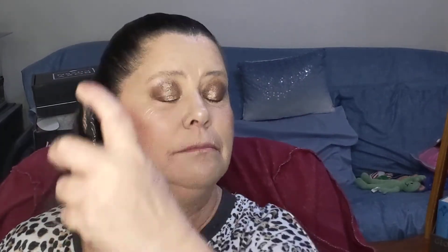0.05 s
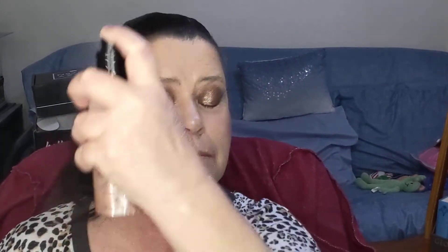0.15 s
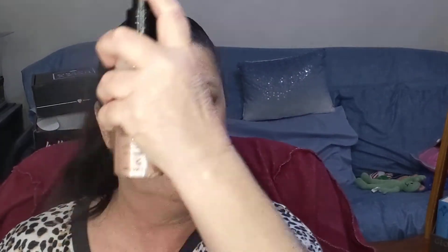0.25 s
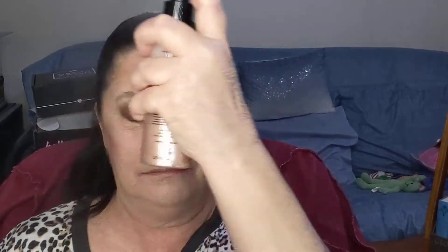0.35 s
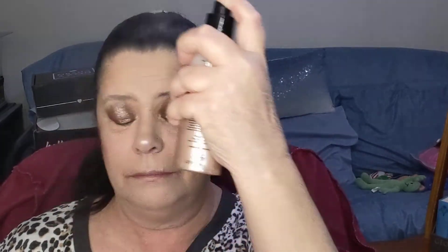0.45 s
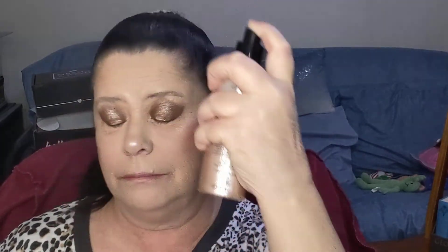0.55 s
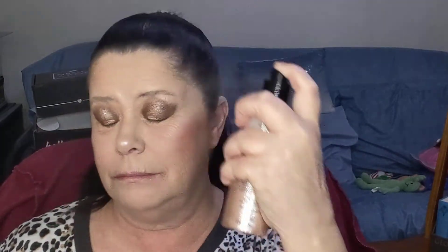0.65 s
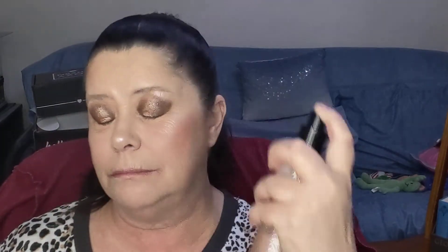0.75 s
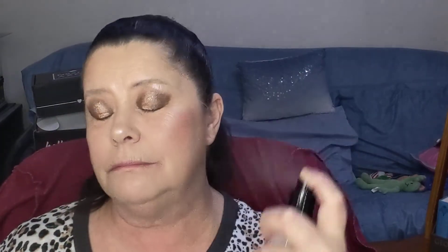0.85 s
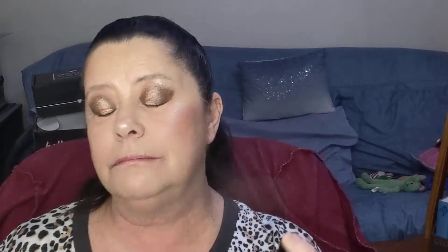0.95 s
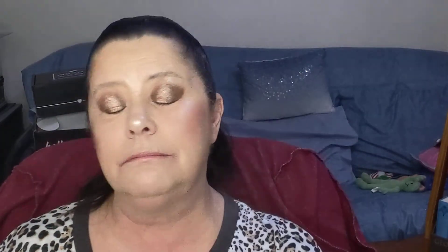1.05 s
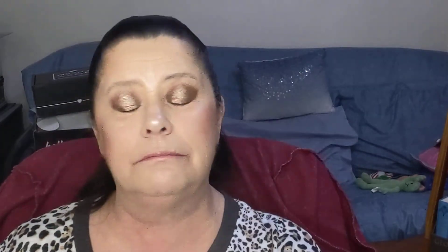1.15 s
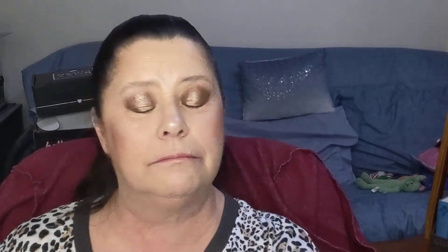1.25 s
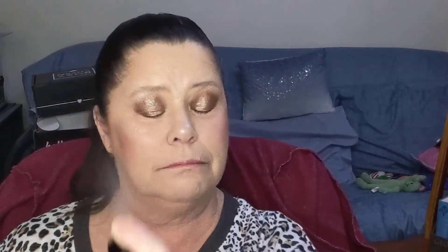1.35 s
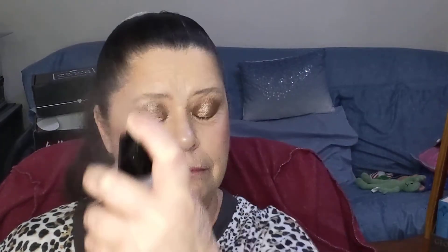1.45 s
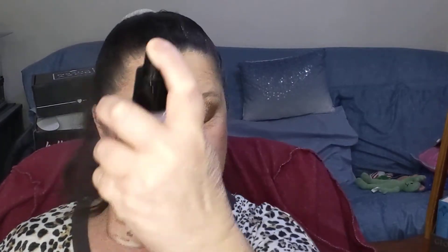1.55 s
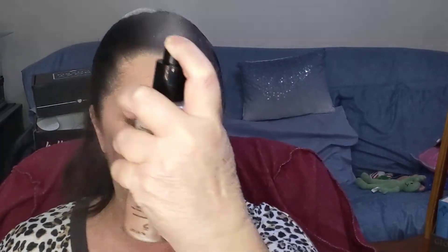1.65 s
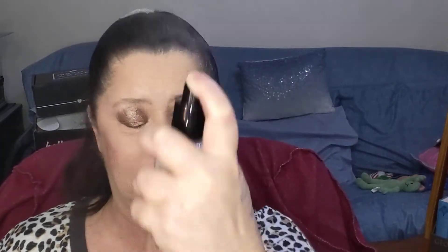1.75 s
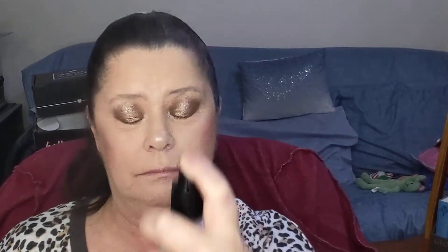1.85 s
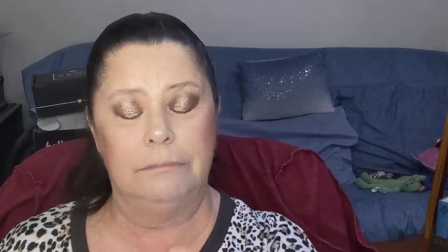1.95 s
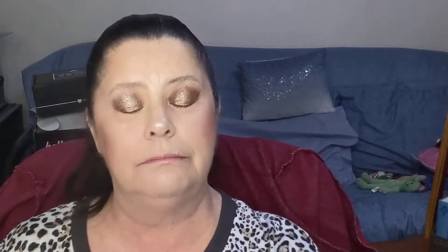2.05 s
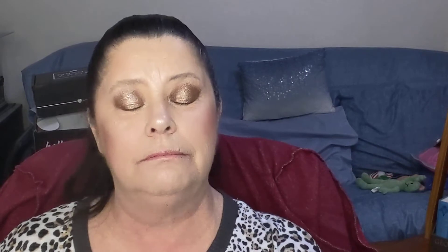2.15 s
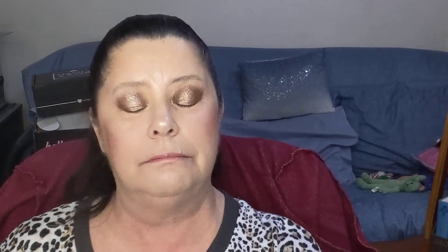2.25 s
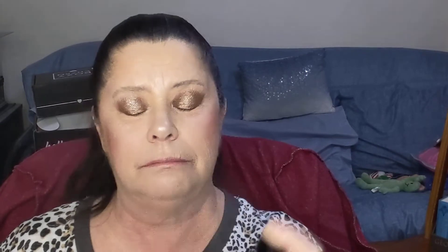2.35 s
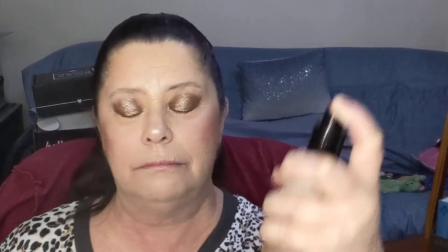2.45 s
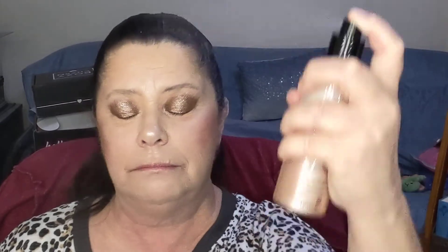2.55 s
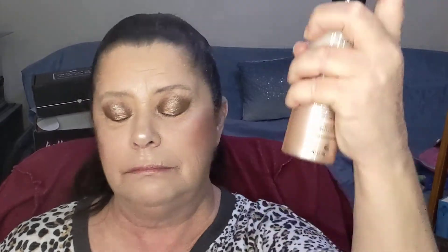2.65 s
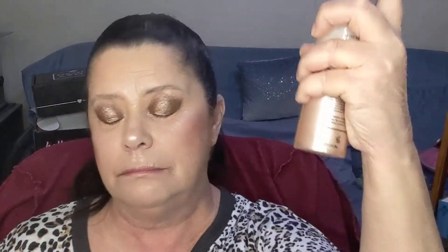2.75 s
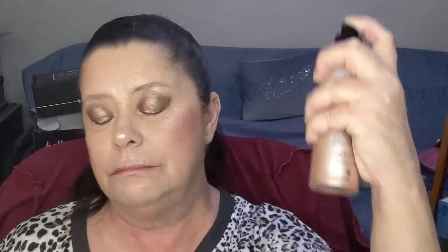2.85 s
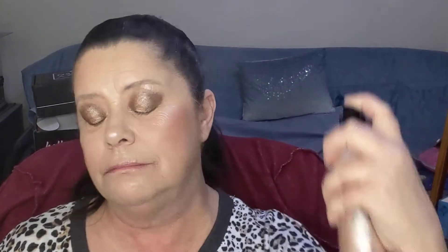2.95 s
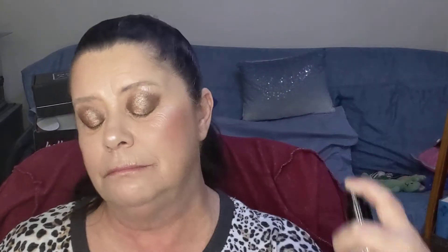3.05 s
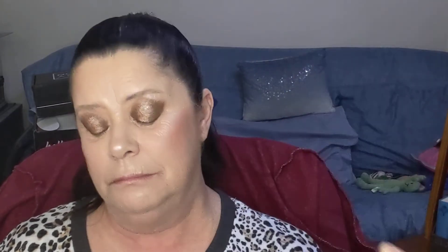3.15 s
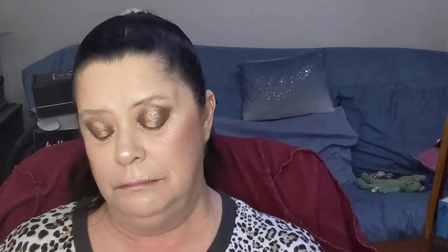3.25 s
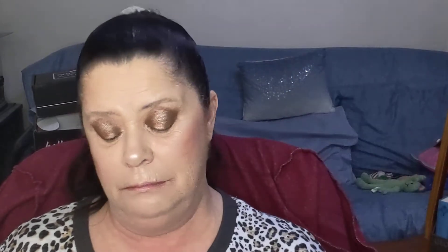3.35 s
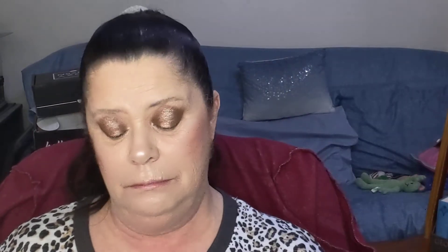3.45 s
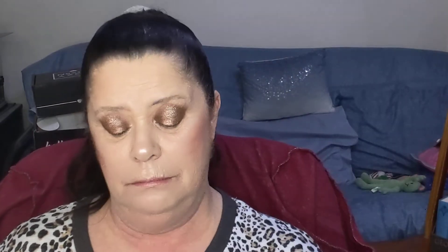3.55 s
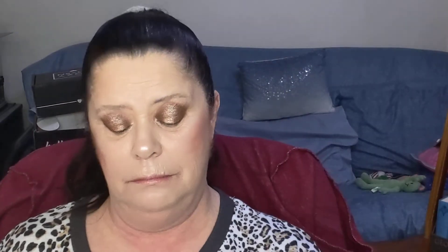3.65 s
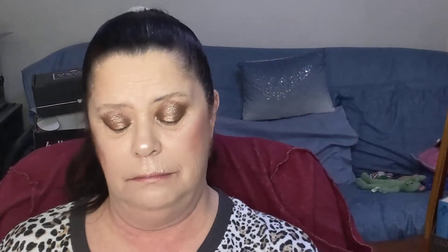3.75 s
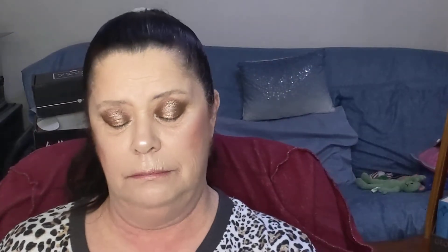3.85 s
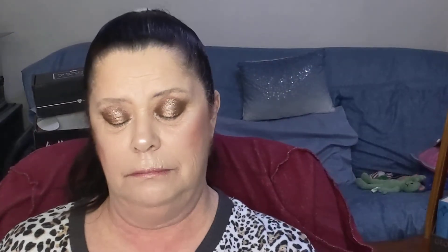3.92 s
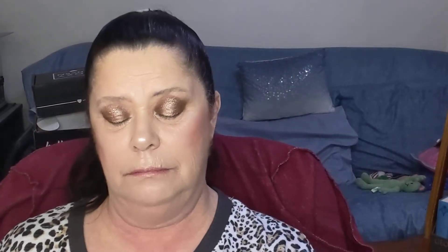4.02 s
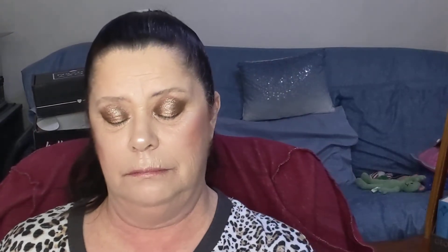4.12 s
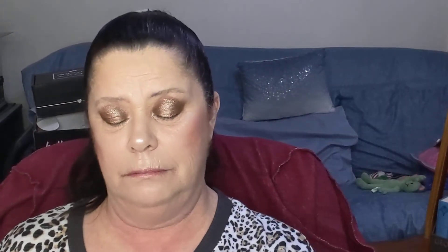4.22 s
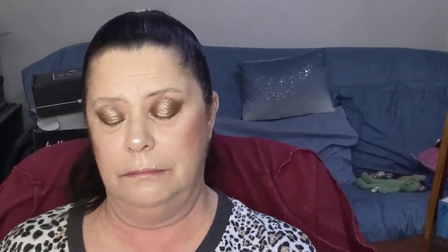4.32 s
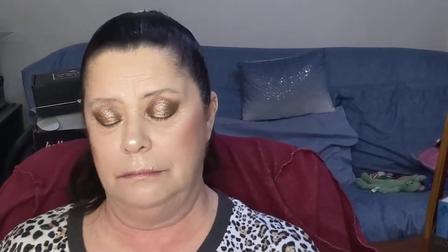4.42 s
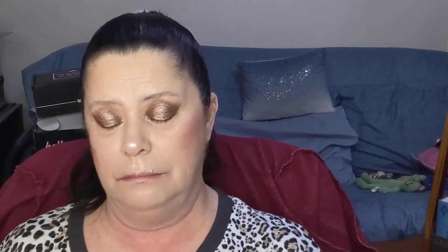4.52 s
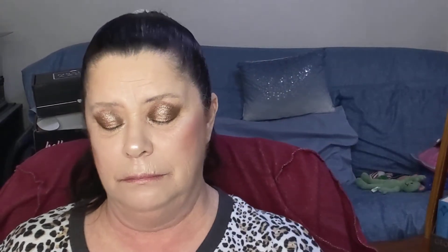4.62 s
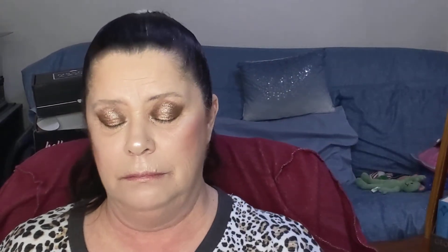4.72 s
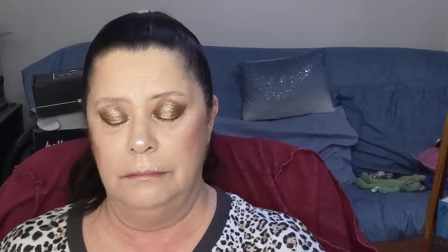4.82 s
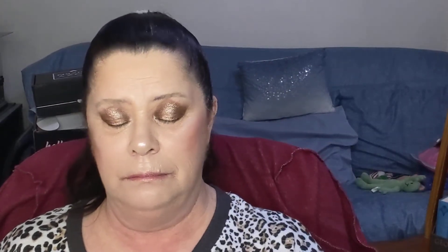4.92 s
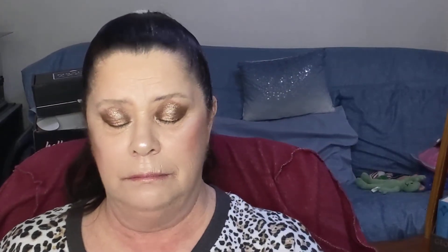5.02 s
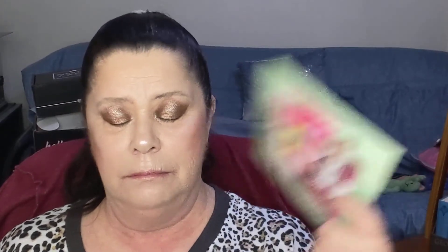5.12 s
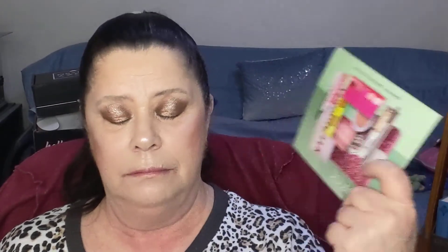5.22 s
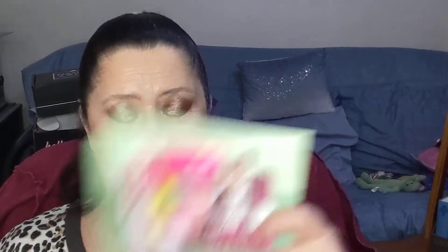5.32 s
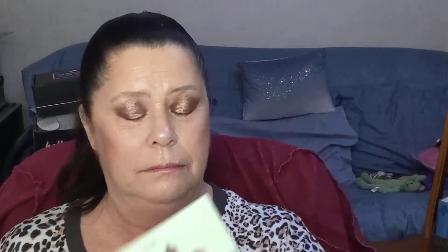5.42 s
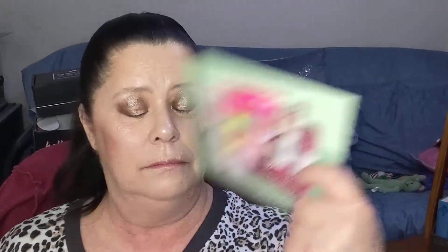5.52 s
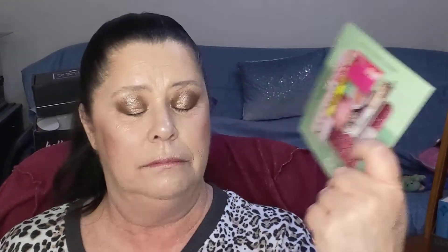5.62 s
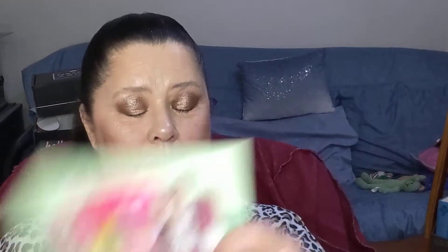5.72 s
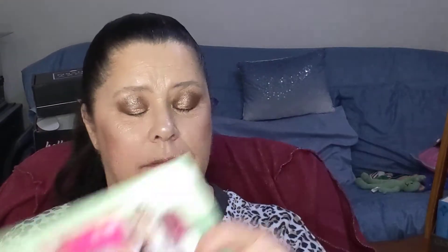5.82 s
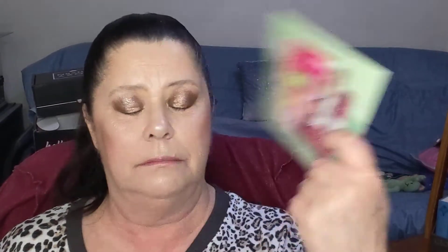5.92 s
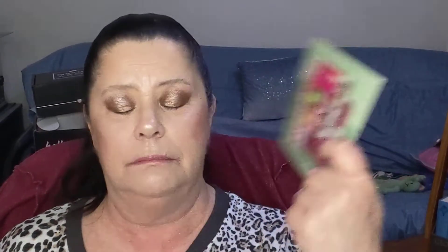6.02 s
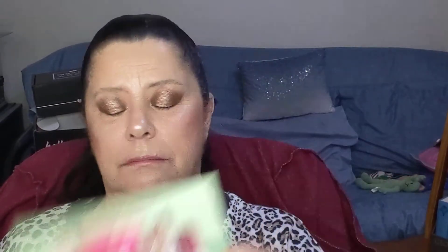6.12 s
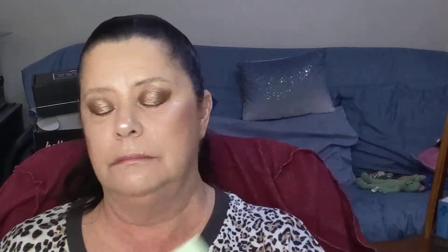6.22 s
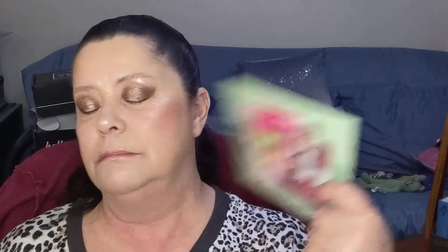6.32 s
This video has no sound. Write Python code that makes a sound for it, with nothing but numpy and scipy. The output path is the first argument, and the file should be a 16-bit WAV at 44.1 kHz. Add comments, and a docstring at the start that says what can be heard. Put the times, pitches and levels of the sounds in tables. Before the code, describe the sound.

Close to the microphone in a small furnished room with a faint electrical hum, a mist bottle is pumped rapidly, about four times a second. Every puff hisses and ends with a clack of the plunger and a light tick. The spraying stops, and the bottle is put down on a table with a sharp knock, a low thump and a short wobble. A light click and the soft scrape of a card follow.

```python
"""A small furnished room, still air and mains hum, a camera's stereo microphone close to the hands.
A pump bottle of face mist is pressed twelve times. Each stroke hisses until the plunger clacks on its
stop; the spring pings as the finger lets go, and a quick next press catches the rising head with a tick.
The liquid slops briefly. The bottle is put down on a table with a knock and a thump and rocks;
then a card is picked up with a faint scrape."""
import sys
import numpy as np
from scipy import signal
from scipy.fft import rfft, irfft, next_fast_len
from scipy.io import wavfile
from scipy.ndimage import uniform_filter1d, map_coordinates

SR = 44100
rng = np.random.default_rng(int(sys.argv[2]) if len(sys.argv) > 2 else 0)


def waveform_to_disk(signal):
    """Save audio, clipped to [-1, 1], as 16-bit WAV at the path in sys.argv[1]."""
    frames = np.transpose(np.atleast_2d(signal))
    scaled = np.clip(frames, -1, 1) * 32767
    samples = np.round(scaled).astype(np.int16)
    wavfile.write(sys.argv[1], SR, samples)


N = 281358

# room tone: (frequency [Hz], level [dB])
AIR_SPECTRUM = [(25, -30), (55, -11.5), (90, -15), (110, -8.5), (165, -5.5), (230, -7.5), (285, -17.5),
                (365, -17.5), (560, -20.5), (1400, -23), (1800, -23.5), (4000, -29), (11000, -39.5),
                (15800, -47)]
# how alike the air is at the two microphone ports: (frequency [Hz], correlation [ratio])
AIR_LIKENESS = [(60, 0.46), (200, 0.18), (600, 0.6), (2000, 0.033), (8000, 0.057)]
# mains partials: (frequency [Hz], peak level [dB])
HUM_PARTIALS = [(59.2, -77.5), (118.4, -65.5), (177.6, -71), (355.3, -83)]
# the room's tail: (frequency [Hz], t60 [s])
ROOM_DECAY = [(100, 0.57), (500, 0.29), (2000, 0.33), (6000, 0.35), (15000, 0.2)]
# imbalance of the microphone ports: (frequency [Hz], left minus right [dB])
PORT_BALANCE = [(1500, -0.05), (8500, -0.5), (11500, 4), (13700, 11), (15800, -5)]

# pump strokes: (start [s], plunger stop [s], level [dB], extra mist body [dB], shell resonance [Hz])
STROKES = [(-.065, 0.0498, -50.5, 3, 1960), (0.17, .2855, -51, 3, 1790), (0.403, .519, -53.5, 5.5, 1820),
           (0.628, .743, -54.5, 3, 1920), (.859, .995, -53.5, 0, 1820), (1.145, 1.283, -49.5, 2, 1840),
           (1.4, 1.53, -50, 3.5, 1880), (1.659, 1.787, -52.2, 6, 1750), (1.921, 2.0454, -51.5, 2.5, 1860),
           (2.337, 2.455, -51.5, 3.5, 1800), (2.568, 2.695, -51, -4, 1780), (2.828, 2.946, -53, -1, 1870)]
# the jet at even steps of the plunger's travel: (relative level [dB])
JET_PRESSURE = [-7.5, -1.5, -0.5, -1.3, -11, -4.5]
# spectra of the pump, close up: (frequency [Hz], level [dB])
MIST_SPECTRUM = [(200, -55), (700, -12), (1300, -6.5), (1750, -3.5), (2800, -1.5), (5500, -1.5),
                 (8300, -3.5), (10000, -5.5), (10800, -0.5), (13500, -5), (15800, -9)]
CLACK_SPECTRUM = [(100, -52), (300, -9), (550, -4), (900, -2.5), (1350, -7.5), (1780, 2.5), (2100, -5.5),
                  (2500, -1.5), (3700, -22), (6000, -13.5), (8300, -22), (10000, -17.5), (10750, -13),
                  (15800, -38)]
SHELL_SPECTRUM = [(250, -32), (440, 1.5), (600, -25.5), (1000, -8.5), (1500, -9.5), (1820, 5.5), (2150, -5),
                  (2800, -11), (3300, -21), (6000, -18.5), (15800, -47)]
TICK_SPECTRUM = [(300, -14), (1200, -31), (1800, -22), (3500, 2.5), (6000, 7.5), (8000, 0.5), (9200, 8),
                 (10800, 4), (15800, -3)]
HOLLOW_SPECTRUM = [(120, -18.5), (400, 12.5), (800, 4), (1200, -0.5), (1800, 6), (3500, -7), (15000, -81)]
# return spring modes: (frequency [Hz], level [dB], t60 [s])
SPRING_MODES = [(9050, -39, .06), (9230, -43, .05), (10750, -42, .025)]
# air pockets in the slopping liquid: (time [s], level [dB], starting pitch [Hz])
SLOPS = [(1.845, -58, 387), (1.907, -47, 500), (1.944, -47.5, 373), (1.947, -44.5, 534),
         (1.949, -50.5, 175)]
# the head coming home and things clicking in the hand: (time [s], level [dB], relative ring [dB])
CLICKS = [(2.234, -37, 13), (3.051, -43.5, 6), (3.335, -43, -8), (3.612, -41, -10), (4.7193, -32, -23)]

# things sliding over the table: (peak time [s], width [s], level [dB], scrape resonance [Hz])
SLIDES = [(3.7, 0.025, -74, 4950), (4.01, .018, -62.5, 3040), (4.114, 0.0194, -62, 4700),
          (4.655, 0.013, -68.5, 1000), (4.885, 0.014, -67.5, 3500), (5.04, 0.046, -68.5, 3500),
          (5.105, 0.013, -61, 1760), (5.23, 0.024, -75, 2200)]
# hard contacts on the table top: (time [s], level [dB], extra treble [dB])
KNOCKS = [(3.9435, -12.5, 0), (3.951, -22, 3.5), (4.016, -37.5, -12), (4.0365, -32.5, -12),
          (4.122, -32.5, -16), (4.7186, -48, 15.5)]
# spectra of rubbing and striking the table top: (frequency [Hz], level [dB])
RUB_SPECTRUM = [(200, -4), (1000, -1.5), (3500, -7), (4900, -8.5), (6300, -10.5), (11000, -13),
                (15800, -22)]
CRACK_SPECTRUM = [(80, -24.5), (400, 2.5), (750, 5.5), (1100, 7), (1550, 4), (2200, -13), (3800, -9.5),
                  (5200, -13.5), (6500, -22.5), (11000, -22), (15800, -35)]
RATTLE_SPECTRUM = [(200, -10.5), (500, -1.5), (720, 2), (1000, -4), (1330, -2), (1750, -4), (2200, -14),
                   (3700, -14.5), (6000, -23.5), (11000, -30), (15800, -36)]
# weight landing and rocking: (time [s], level [dB], frequency driven most [Hz])
THUMPS = [(3.9527, -18.5, 228.4), (3.972, -17.5, 80.5), (4.136, -35.5, 140), (4.178, -43.5, 125),
          (4.734, -53, 247)]
# modes of the bottle's base and of the table: (frequency [Hz], level [dB], t60 [s])
BASE_MODES = [(1296, -20, 0.076), (1550, -8, 0.0285), (4760, -18.5, 0.013)]
TABLE_MODES = [(65.4, -2.5, 0.17), (96.6, -5, 0.2), (126.9, -4.5, 0.37), (157.2, -0.5, 0.18),
               (202, 4, 0.078), (242, -4.5, 0.16), (330, -2.5, 0.16), (426, -6, 0.12)]


def amp(db):
    """Decibels to gain."""
    return 10 ** (np.asarray(db) / 20)


def unit(x):
    """Scale to rms 1."""
    return x / np.sqrt(np.mean(x ** 2) + 1e-20)


def along(points, hz):
    """Read (frequency [Hz], value) points on a log axis."""
    freqs, values = np.transpose(points)
    return np.interp(np.log(hz + 1), np.log(freqs), values)


def filtered(x, response):
    """Shape x by a response, given as a function of frequency."""
    size = next_fast_len(N + SR // 2)
    return irfft(rfft(x, size) * response(np.fft.rfftfreq(size, 1 / SR)), size)[..., :N]


def noise(spectrum):
    """Coloured noise of rms 1."""
    return unit(filtered(rng.standard_normal(N), lambda hz: amp(along(spectrum, hz))))


def resonance(x, centre_hz, width_hz):
    """Pass x through one causal resonance."""
    return filtered(x, lambda f: 1j * f * width_hz / (centre_hz ** 2 - f * f + 1j * f * width_hz))


def snap(spectrum, size=2048):
    """The shortest causal click with this spectrum, peak 1, padded to half a second."""
    cepstrum = irfft(np.log(amp(along(spectrum, np.fft.rfftfreq(size, 1 / SR)))))
    cepstrum[1:size // 2] *= 2
    cepstrum[size // 2 + 1:] = 0
    click = irfft(np.exp(rfft(cepstrum)))
    return np.pad(click / np.abs(click).max(), (0, SR // 2 - size))


def chatter(spectrum, t60):
    """A dying burst of dense vibration, with about the energy of one snap."""
    t = np.arange(SR // 2) / SR
    burst = rng.standard_normal(len(t)) * amp(-60 * t / t60) * (1 - np.exp(-t / .0006))
    return signal.fftconvolve(snap(spectrum), burst / np.linalg.norm(burst))[:len(t)]


def ring(modes, scatter_db, detune=0):
    """Damped modes, struck at new strengths each time and optionally detuned."""
    out, t = np.zeros(SR // 2), np.arange(SR // 2) / SR
    for k, (hz, db, t60) in enumerate(modes):
        envelope = amp(db + scatter_db * rng.standard_normal() - 60 * t / t60)
        pitch_hz = hz * (1 + detune * rng.standard_normal())
        out += (-1) ** k * envelope * np.sin(2 * np.pi * pitch_hz * t)
    return out


def add(track, time_s, sound):
    """Mix a sound in from time_s."""
    start = round(time_s * SR)
    sound = sound[..., max(-start, 0):N - start]
    track[..., max(start, 0):max(start, 0) + sound.shape[-1]] += sound


def in_room(x, early_db, late_db, lag=0):
    """At the microphone: direct sound (lag samples later on the right), near surfaces, the room's tail."""
    hz, frame_s, bins = signal.stft(rng.standard_normal((2, SR // 2)), SR, nperseg=256)
    decay = amp(-60 * frame_s / along(ROOM_DECAY, hz)[:, None])
    late = signal.istft(bins * decay, SR, nperseg=256)[1]
    t = np.arange(late.shape[1]) / SR
    late *= 1 - np.exp(-t / 0.01)
    early = rng.standard_normal(late.shape) * amp(-60 * t / 0.076) * (1 - np.exp(-t / 0.00043))
    early = amp(early_db) * early / np.linalg.norm(early[0])
    mid, side = early + amp(late_db) * late / np.linalg.norm(late[0])
    # long waves reach the two ports alike
    side = signal.lfilter(*signal.butter(1, 900, "high", fs=SR), side)
    direct = np.sinc(np.arange(len(t)) - 8 - np.array([[-.5], [.5]]) * lag)
    return signal.fftconvolve(x[None], direct + np.array([mid + side, mid - side]), axes=1)


def room_tone():
    """Still air all round the microphone, widest in the treble."""
    spread = lambda hz: np.arccos(np.clip(along(AIR_LIKENESS, hz), -1, 1)) / 2
    mid = filtered(noise(AIR_SPECTRUM), lambda hz: np.cos(spread(hz)))
    side = filtered(noise(AIR_SPECTRUM), lambda hz: np.sin(spread(hz)))
    return amp(-64.5) * np.array([mid + side, mid - side])


def mains_hum():
    """A faint hum, dead centre, each partial drifting in phase."""
    t = np.arange(N) / SR
    drift = lambda: map_coordinates(rng.standard_normal(N // SR * 2 + 6), [2 * t])
    return sum(amp(db) * np.sin(2 * np.pi * hz * t + 0.22 * drift()) for hz, db in HUM_PARTIALS)


def mist():
    """Close by, the valve snaps open; the jet swells with finger pressure and eases toward the stop."""
    out, jet = np.zeros((2, N)), noise(MIST_SPECTRUM)
    body = resonance(jet, centre_hz=2800, width_hz=1230)
    for start, stop, db, body_db, _ in STROKES:
        t = np.arange(round((stop - start) * SR)) / SR
        travel = t / t[-1]
        pressure_db = np.interp(travel, np.linspace(0, 1, len(JET_PRESSURE)), JET_PRESSURE)
        valve = (1 - np.exp(-t / .003)) * (1 - np.exp(-(t[-1] - t) / .003))
        # the liquid sheet tears into droplets unevenly
        tearing_db = 1.6 * unit(uniform_filter1d(rng.standard_normal(len(t)), size=40))
        hiss = np.roll(jet + (amp(body_db) - 1) * body, -round(start * SR))[:len(t)]
        # an echo off the moving hand gives every puff its own shifting colour
        first_s, last_s = rng.uniform(.0003, 0.000676) + rng.uniform(0, 0.00031, size=2)
        delay_s = first_s + (last_s - first_s) * travel
        echo = 0.18 * map_coordinates(hiss, [(t - delay_s) * SR])
        puff = (hiss + echo) * valve * amp(db + pressure_db + tearing_db)
        add(out, start, in_room(puff, early_db=-1.5, late_db=-4.5, lag=1))
    return out


def plunger(over_mist_db=24, usual_shell_hz=1830):
    """The plunger hits its stop as hard as it was pressed, and the plastic shell buzzes briefly."""
    out = np.zeros((2, N))
    for _, stop, db, _, shell_hz in STROKES:
        # the grip shifts the shell's resonances from stroke to stroke
        shell = [(hz * shell_hz / usual_shell_hz, level) for hz, level in SHELL_SPECTRUM]
        clack = snap(CLACK_SPECTRUM) + amp(-2) * chatter(CLACK_SPECTRUM, t60=0.02)
        buzz = amp(-3.5) * chatter(shell, t60=0.11)
        add(out, stop, amp(db + over_mist_db) * in_room(clack + buzz, early_db=-7.5, late_db=-12, lag=1))
    return out


def ticks(release_s=.046, catch_lead_s=.022, quick_rest_s=.11, fade_db_per_s=700, hollow_db=-8.5):
    """Small parts tick, knock and ping: the spring lets go, the finger catches the head, things click."""
    out = np.zeros((2, N))
    starts, stops = np.transpose(STROKES)[:2]
    # each event: (time [s], level [dB], relative knock [dB], relative ring [dB])
    releases = [(stop + release_s, -44.5, -1.5, 16.5) for stop in stops]
    # the shorter the rest, the faster the head is still rising when the finger meets it
    catches = [(start - catch_lead_s, -30 - fade_db_per_s * (rest - quick_rest_s), hollow_db, -12)
               for start, rest in zip(starts[1:], starts[1:] - stops[:-1])]
    clicks = [(time_s, db, hollow_db, ring_db) for time_s, db, ring_db in CLICKS]
    for time_s, db, knock_db, ring_db in releases + catches + clicks:
        tick = amp(-5) * snap(TICK_SPECTRUM) + amp(-3) * chatter(TICK_SPECTRUM, t60=0.01)
        knock = amp(knock_db) * chatter(HOLLOW_SPECTRUM, t60=0.032)
        ping = amp(ring_db) * ring(SPRING_MODES, scatter_db=2, detune=.005)
        add(out, time_s, amp(db) * in_room(tick + knock + ping, early_db=-1.5, late_db=-7, lag=1))
    return out


def liquid(life_cycles=24):
    """Air pockets ring, rising in pitch, as the liquid slops; big ones ring longest."""
    out, t = np.zeros((2, N)), np.arange(SR // 2) / SR
    for time_s, db, hz in SLOPS:
        age = t * hz / life_cycles
        envelope = amp(db - 60 * age) * (1 - np.exp(-t / 0.00049))
        bubble = envelope * np.sin(2 * np.pi * hz * t * (1 + 0.041 * age))
        add(out, time_s, in_room(bubble, early_db=-4, late_db=-15))
    return out


def slides(scrape_equals_rub_db=-61.5, scrape_growth=2.3):
    """Bottle and card rub over the table in small grains; the harder the rub, the more the scrape rings."""
    out, t = np.zeros(N), np.arange(N) / SR
    grain = amp(3.2 * unit(uniform_filter1d(rng.standard_normal(N), size=90)))
    rub, drive = unit(grain * noise(RUB_SPECTRUM)), grain * noise(RUB_SPECTRUM)
    for peak_s, width_s, db, hz in SLIDES:
        scrape_db = scrape_growth * (db - scrape_equals_rub_db)
        scrape = amp(scrape_db) * unit(resonance(drive, hz, width_hz=430))
        swell = np.exp(-.5 * ((t - peak_s) / width_s) ** 2)
        out += amp(db) * swell * (rub + scrape)
    return in_room(out, early_db=2, late_db=-6.5)[:, :N]


def knocks():
    """A hard edge strikes the table top: a crack, the ring of the bottle's base and a rattle."""
    out = np.zeros((2, N))
    for time_s, db, treble_db in KNOCKS:
        crack = amp(-2) * snap(CRACK_SPECTRUM) + amp(-1.5) * chatter(CRACK_SPECTRUM, t60=0.011)
        knock = crack + ring(BASE_MODES, scatter_db=1.5) + chatter(RATTLE_SPECTRUM, t60=0.16)
        treble = signal.lfilter(*signal.butter(1, 3000, "high", fs=SR), knock)
        knock += (amp(treble_db) - 1) * treble
        add(out, time_s, amp(db) * in_room(knock, early_db=-8.5, late_db=-12, lag=1))
    return out


def thumps():
    """The weight lands and rocks, and the table booms a little left of the microphone."""
    out, t = np.zeros((2, N)), np.arange(SR // 2) / SR
    lean_left, rise_cycles = amp([[.8], [-.8]]), 0.63
    for time_s, db, driven_hz in THUMPS:
        # a contact feeds the modes whose period matches its own length
        modes = [(hz, level - 9 * abs(np.log2(hz / driven_hz)), t60) for hz, level, t60 in TABLE_MODES]
        boom = ring(modes, scatter_db=3.5) * (1 - np.exp(-t * driven_hz / rise_cycles))
        add(out, time_s, amp(db) * lean_left * in_room(boom, early_db=-19, late_db=-23, lag=16))
    return out


def scene():
    """Bottle, table and room as they reach the microphone."""
    bottle = mist() + plunger() + ticks() + liquid()
    table = knocks() + thumps() + slides()
    return bottle + table + room_tone() + mains_hum()


def record(dry, top_hz=15900):
    """The microphone's two ports differ in the high treble; the camera keeps nothing above top_hz."""
    ports = lambda hz: amp(np.outer([.5, -.5], along(PORT_BALANCE, hz)))
    return filtered(dry, lambda hz: ports(hz) / ports(hz).mean(axis=0) * (hz < top_hz))


dry = scene()
out = record(dry)
waveform_to_disk(out)
```